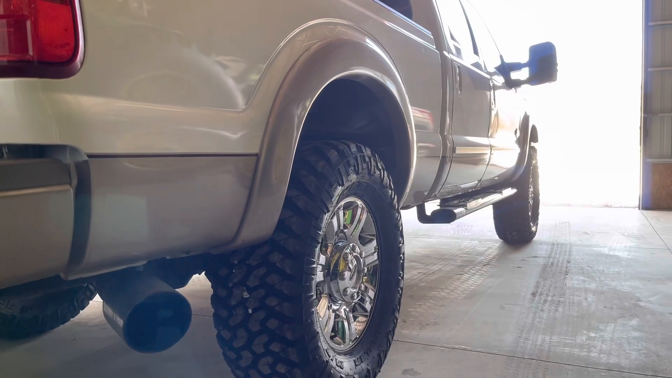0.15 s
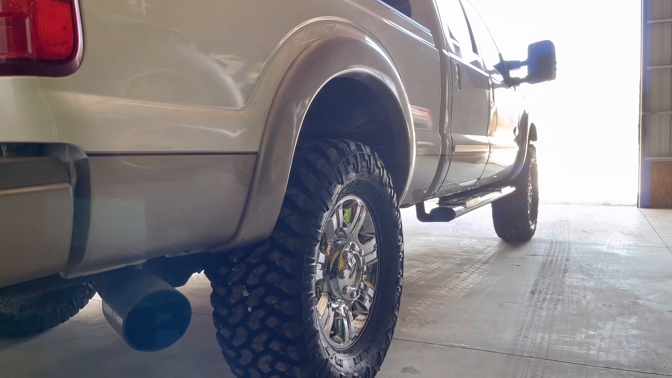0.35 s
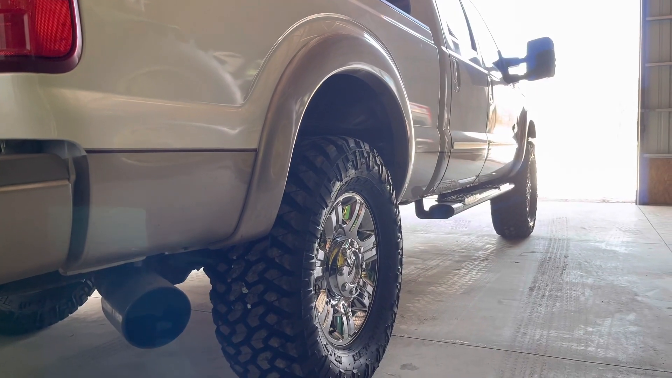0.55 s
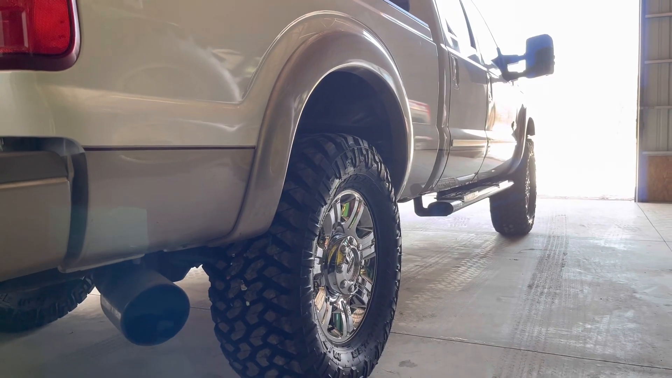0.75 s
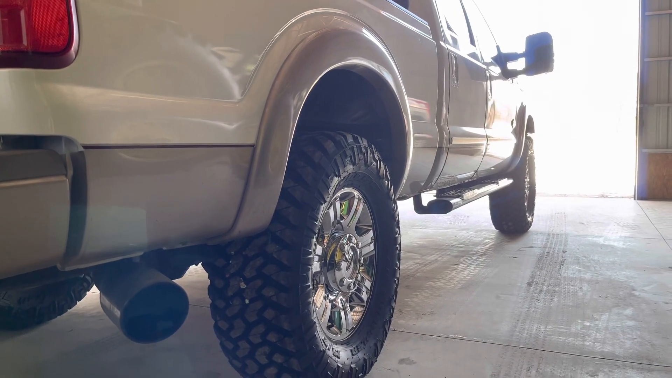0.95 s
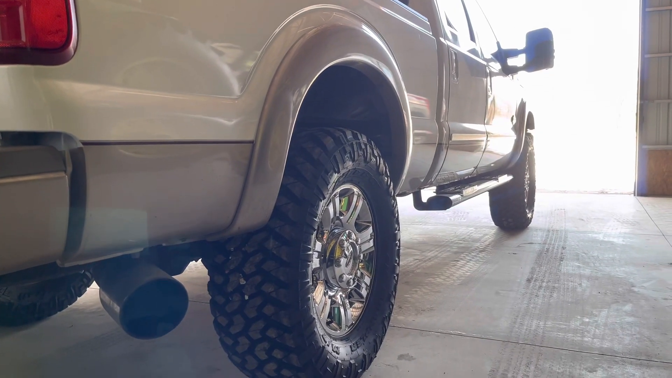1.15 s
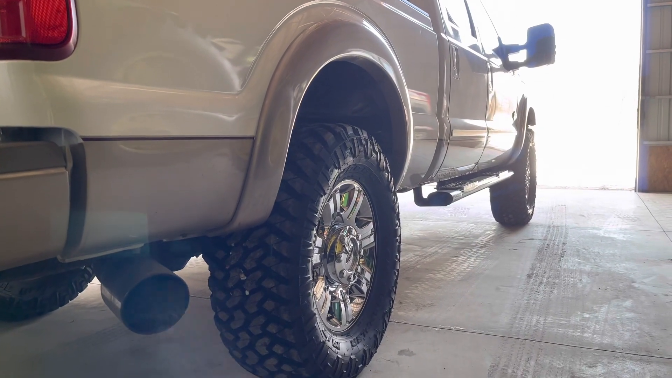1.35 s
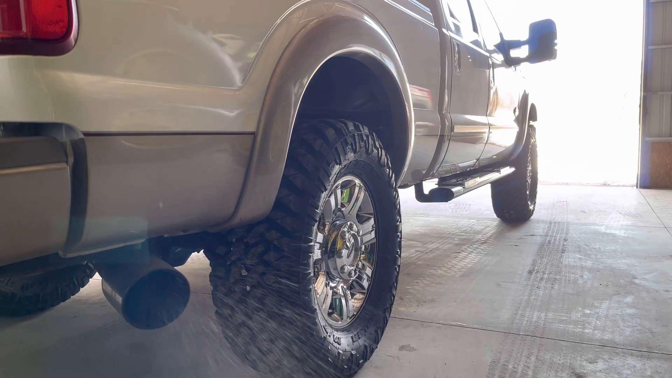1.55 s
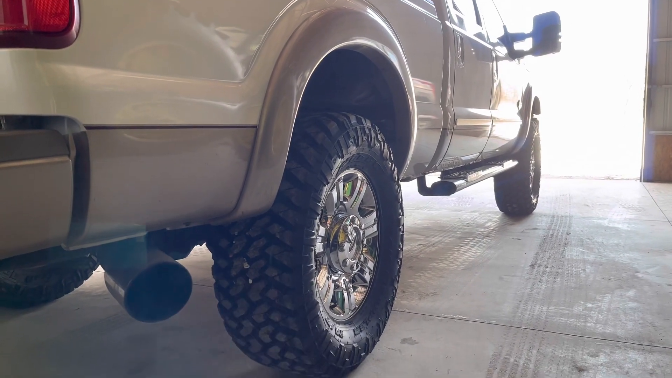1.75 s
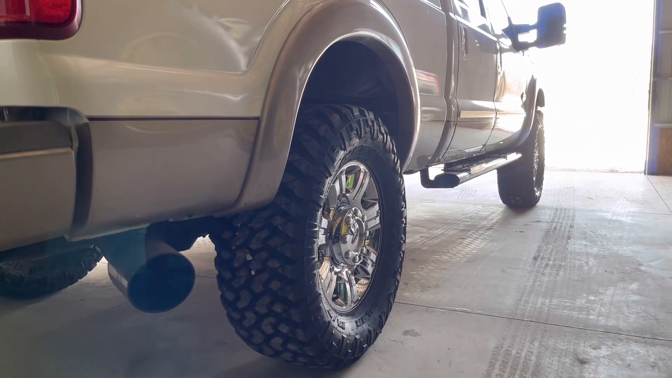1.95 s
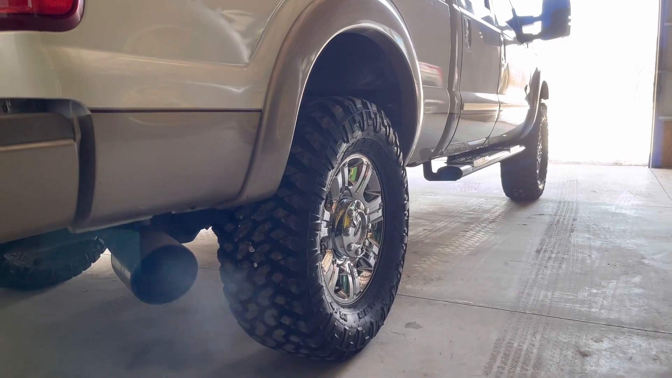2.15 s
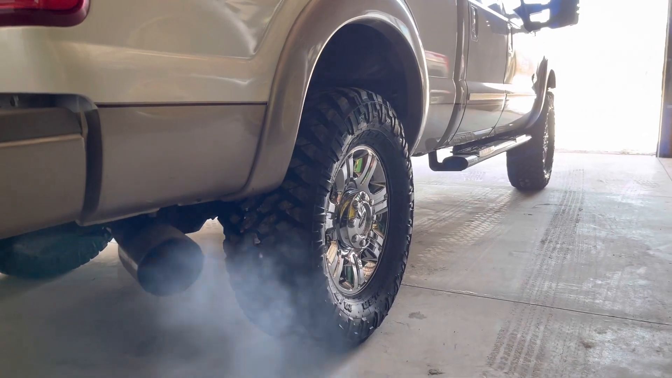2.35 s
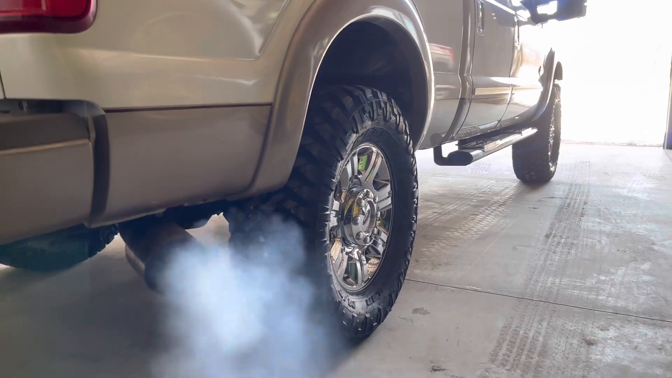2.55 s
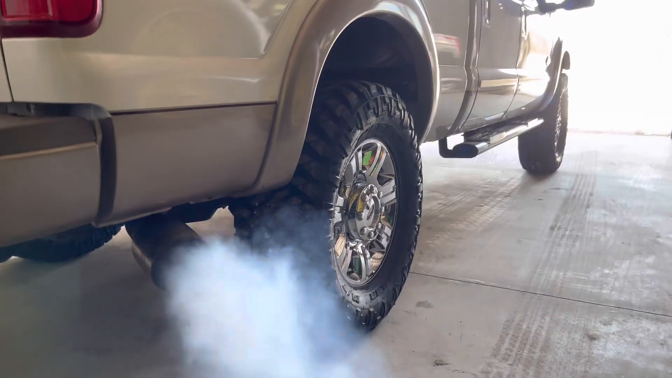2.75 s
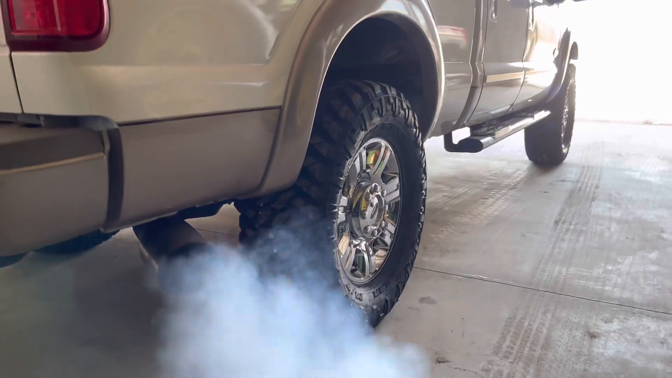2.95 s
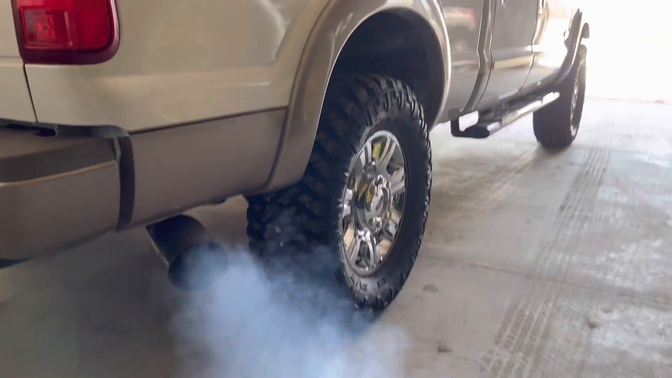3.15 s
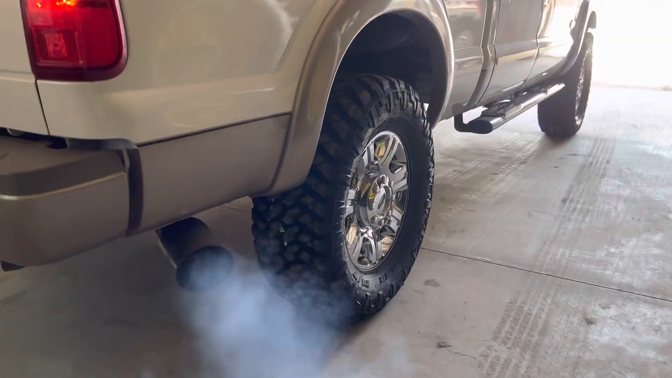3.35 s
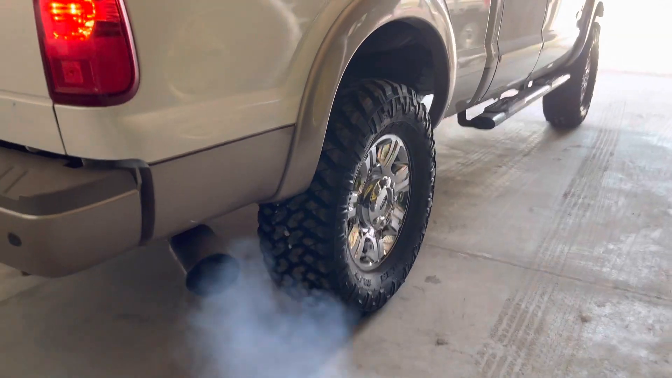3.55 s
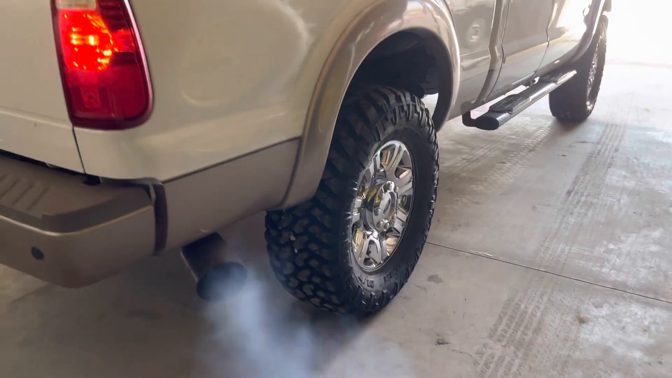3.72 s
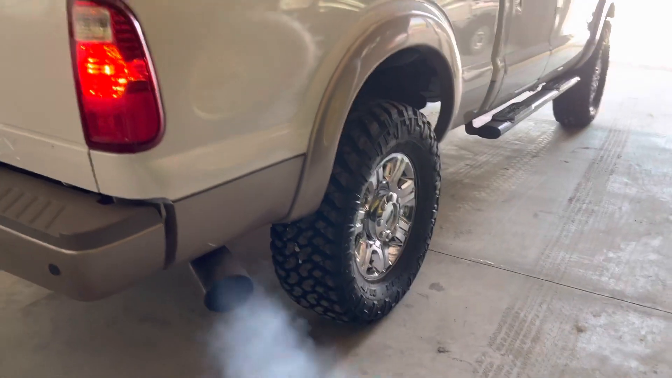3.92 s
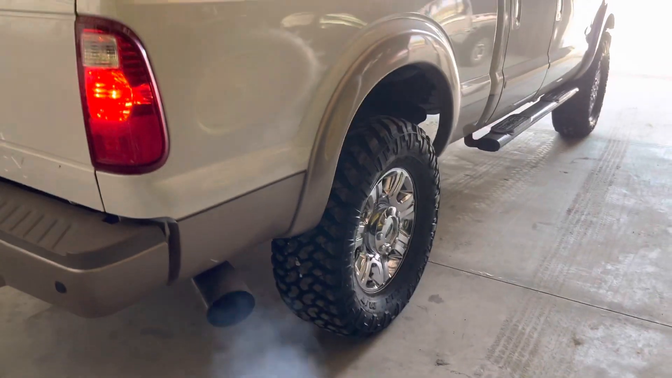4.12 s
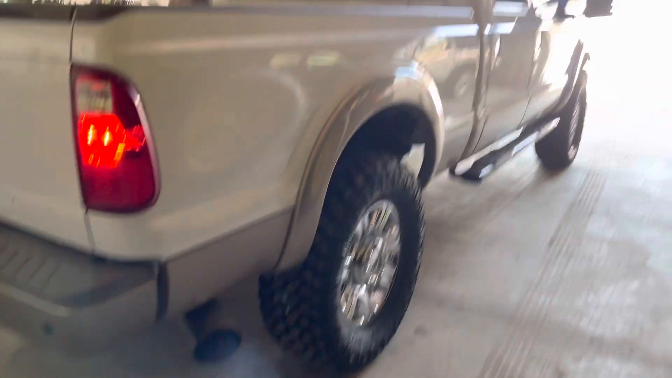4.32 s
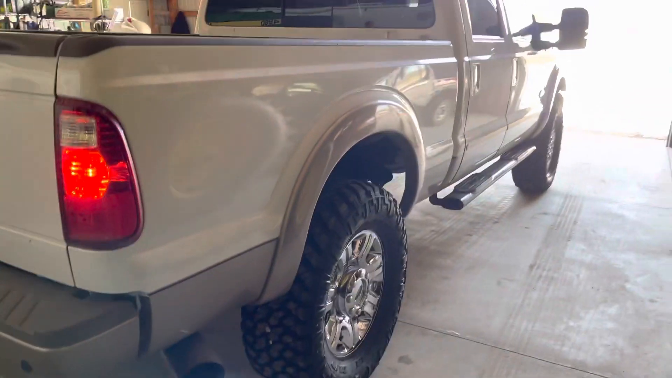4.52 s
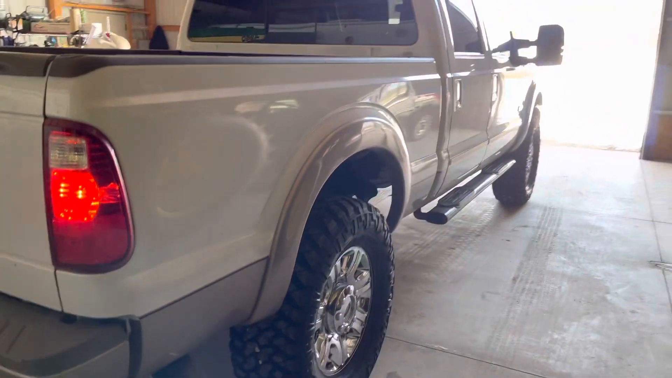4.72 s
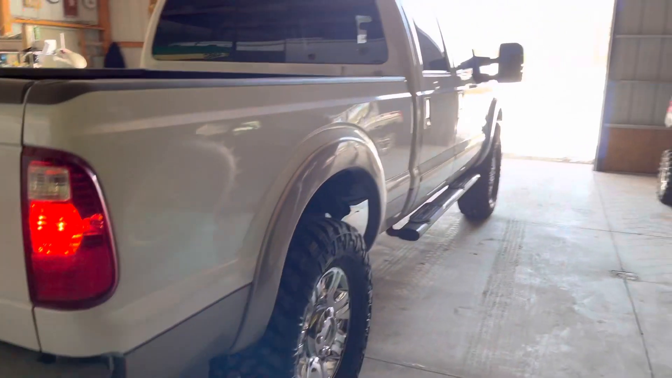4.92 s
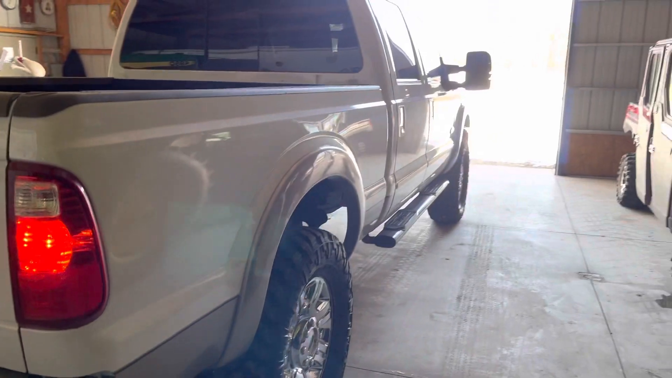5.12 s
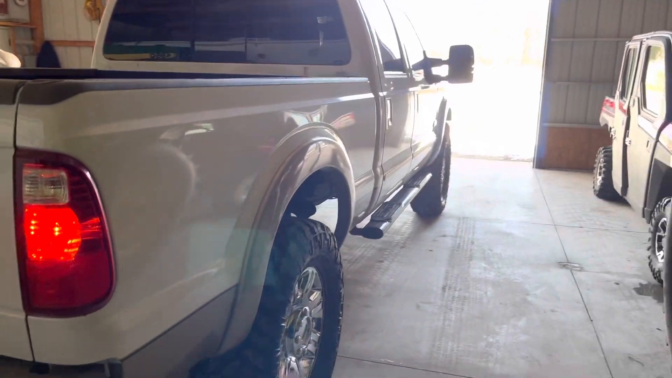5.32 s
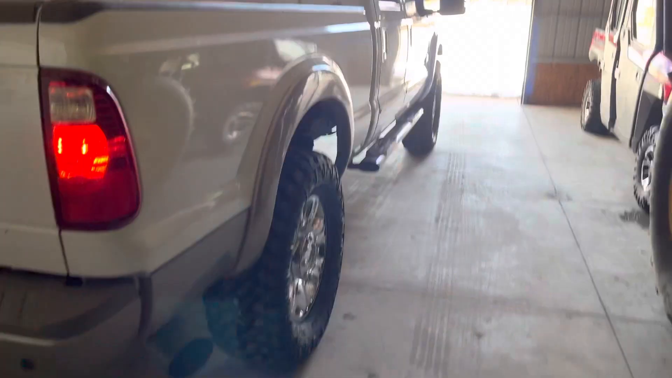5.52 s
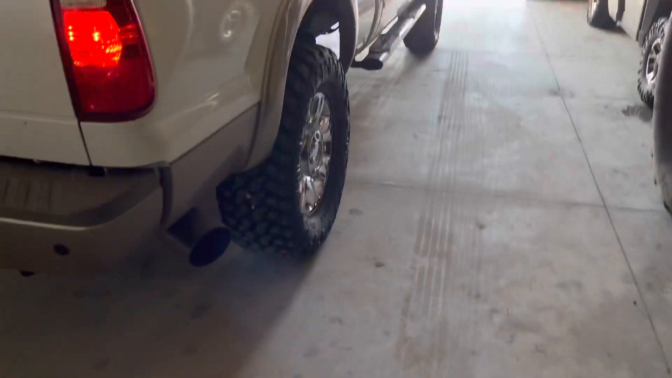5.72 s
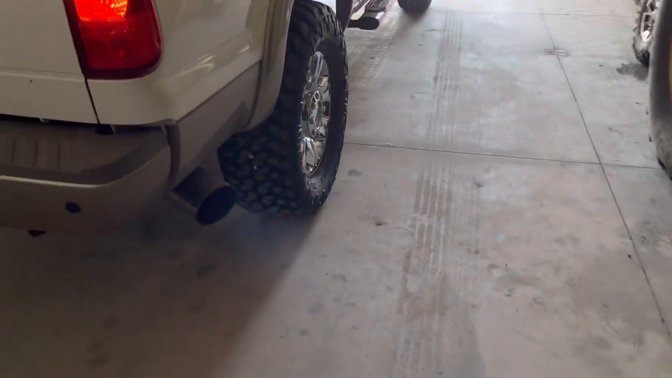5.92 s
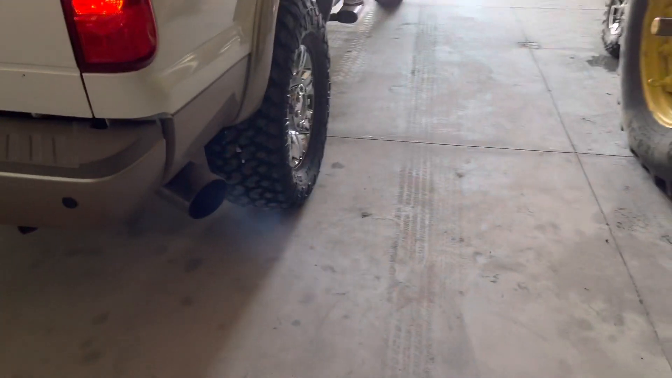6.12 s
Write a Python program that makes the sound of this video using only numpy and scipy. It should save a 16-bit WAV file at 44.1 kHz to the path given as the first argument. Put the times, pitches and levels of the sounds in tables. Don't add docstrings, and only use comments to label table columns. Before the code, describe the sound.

From 0 to 0.5 seconds there is only faint outdoor rumble and a very quiet fuel pump hum. At 0.54 a starter pinion clacks in; its rough metallic whine rises and sags against each compression, with grinding, short squeals and soft low puffs of air from the exhaust. Around 1.2 the diesel catches abruptly, very loud and close: ragged bangs, booming pipe and coarse roar, racing slightly and stumbling until about 2. A thin rising squeal of the released starter fades by 1.4. From 1.9 to 3.1 loose sheet metal rattles over uneven firing as the level falls. After 3.2 it is a regular, fast, low throbbing idle with dull knocks, valve clatter, hiss and sharp ticks, a little more distant, continuing to the cut at about 6.2. Concrete walls add short, bright reverberation throughout.

```python
import sys
import numpy as np
from scipy import signal
from scipy.fft import rfft, irfft, next_fast_len
from scipy.io import wavfile
from scipy.ndimage import uniform_filter1d

SR = 44100
rng = np.random.default_rng(int(sys.argv[2]) if len(sys.argv) > 2 else 0)


def invert_db(x):
    u = np.asarray(x, float) / 20
    return 10 ** u


def int16_out(signal):
    q = np.round(np.clip(np.atleast_2d(signal).T, -1, 1) * 32767)
    wavfile.write(sys.argv[1], SR, q.astype(np.int16))


N = 272097


def unit(x):
    return x / np.sqrt(np.mean(x ** 2) + 1e-20)


def along(points, hz):
    f, v = np.transpose(points)
    return np.interp(np.log(hz + 1), np.log(f + 1), v)


def curves(rows):
    s, *cols = np.transpose(rows)
    return [np.interp(np.arange(N) / SR, s, c) for c in cols]


def filtered(x, response):
    m = next_fast_len(N + SR // 4, real=True)
    return irfft(rfft(x, m) * response(np.fft.rfftfreq(m, 1 / SR)), m)[..., :N]


def coloured(x, spectrum):
    return unit(filtered(x, lambda hz: invert_db(along(spectrum, hz))))


def ringing(x, modes):
    top_hz = 2 * max(c for c, w, db in modes)

    def body(f):
        return sum(invert_db(db) * 1j * f * w / (c * c - f * f + 1j * f * w) for c, w, db in modes)

    return unit(filtered(x, lambda f: body(f) / (1 + 1.4j * f / top_hz - (f / top_hz) ** 2)))


def steady(x, span_s):
    return x / np.sqrt(np.abs(uniform_filter1d(x ** 2, int(span_s * SR))) + 1e-4)


def smooth(x, samples):
    return uniform_filter1d(uniform_filter1d(x, samples), samples)


def between(t0, t1, fade_s):
    t = np.arange(N) / SR
    return (t > t0) * invert_db(-60 * np.clip(t - t1, 0, None) / fade_s)


def hits(at, db):
    return np.bincount(np.clip(at, 0, N - 1).astype(int), invert_db(db), N)


def strikes(rows, t60, rise_s):
    t = np.arange(SR // 5) / SR
    marks = np.bincount([round(s * SR) for s, db in rows], [invert_db(db) for s, db in rows], N)
    return signal.fftconvolve(marks, invert_db(-60 * t / t60) * (1 - np.exp(-t / rise_s)))[:N]


# time in seconds, firings per second.
FIRING = [(1.2, 23), (1.3, 42.5), (1.37, 43.5), (1.43, 47), (1.445, 56), (1.52, 55), (1.535, 48.5),
          (1.58, 49), (1.6, 54), (1.7, 55.57), (1.8, 58.17), (1.95, 56.64), (2.3, 56.5), (2.5, 55.34),
          (2.75, 53.55), (3.0, 54.25), (3.3, 53.62), (6.17, 53.55)]
# time in seconds, share 0-1.
COLD = [(1.2, .96), (1.9, .8), (2.5, .9), (3.2, .15), (4, 0), (6.2, .08)]
# pulse, block ring, knock, tick and hiss, all in dB.
CYLINDERS = [(-1.7, -5, -1.7, -9.5, -4.2), (-2.2, -.5, -2.6, -10.4, -1.4), (-5.0, 0.0, 0.0, -6.3, -1.1),
             (-1.6, -7.5, -1.0, -9.8, -4.1), (-2.4, -4.1, -0.4, -9.3, -3.0),
             (-1.5, -4.7, -2.2, -10.5, -4.8), (0.0, -1.9, -0.7, 0.0, 0.0), (-3.8, -6.2, -1.2, -8.1, -2.6)]


def turn_crank():
    running = np.arange(N) / SR >= FIRING[0][0]
    fired = np.cumsum(curves(FIRING)[0] * running) / SR
    number = np.arange(int(fired[-1]) + 1)
    luck = rng.standard_normal((len(number), 16)).T
    cold = curves(COLD)[0]

    def moment(part):
        return np.interp(number + part, fired[running], np.arange(N)[running])

    def burst(part, db, t60, floor_db):
        t = np.arange(SR // 10) / SR
        shape = invert_db(-60 * t / t60) * (1 - np.exp(-t / .003))
        envelope = signal.fftconvolve(hits(moment(part), db), shape)[:N] + invert_db(floor_db)
        return envelope * rng.standard_normal(N)

    chill = cold[moment(0).astype(int)]
    habits = np.array(CYLINDERS)[number % 8].T
    return dict(fired=fired, number=number, luck=luck, cold=cold, chill=chill, habits=habits,
                moment=moment, burst=burst)


# time in seconds, share 0-1.
LOW_DOWN = [(2.55, 0.99), (2.95, 0.89), (3.6, 0.33), (6.2, 0.37)]


def crouch():
    return np.clip(curves(LOW_DOWN)[0], 0, 1)


# time in seconds, level in dB under the pipe.
WHEEL_ARCH = [(2.9, -20), (3.4, -4), (3.75, -8), (4.2, -11.5), (6.2, -12)]


def arch_db():
    return curves(WHEEL_ARCH)[0]


# frequency in Hz, level in dB.
PULSE = [(30, -44), (42, 16), (52, 11), (80, 21.5), (110, 9.5), (128, 14), (160, -34), (2000, -120)]


def exhaust_pulses(crank):
    chill, luck, pulse = crank["chill"], crank["luck"], crank["habits"][0]
    opening = crank["moment"](.1 + .015 * chill * luck[0])
    db = (1 - .6 * chill) * pulse + (.6 + .5 * chill) * luck[1]
    dips = -coloured(hits(opening, db), PULSE)
    return dips + 0.5 * crouch() * filtered(dips, lambda hz: 1 / (1 + (85 / (hz + 1)) ** 8))


# far bank 0 or 1, then the blow on each of the four pipe modes in dB.
BLOWDOWN = [(1, -4, -12, -17, -2), (1, -9, -8, -22, -5), (0, -13, 0, -15, -8), (1, -9, -12, -22, -12),
            (0, -4, -13, 0, 0), (1, -4, -13, -24, -9), (0, 0, -11, -18, -3), (0, -6, -11, -13, -14)]
# frequency in Hz, width in Hz, level in dB.
PIPE = [(175, 15, -.5), (265, 50, -7), (340, 12, -1), (410, 45, -4)]
# frequency in Hz, density in dB per Hz.
ROAR = [(30, -74), (75, -5.5), (128, -11.5), (140, -3.5), (173, -9.5), (199, -9), (273, -13.5),
        (461, -10.5), (900, -30), (1170, -30), (1980, -120)]


def tailpipe(crank):
    fired, cold, chill, luck = crank["fired"], crank["cold"], crank["chill"], crank["luck"]
    far, *blows = np.array(BLOWDOWN)[crank["number"] % 8].T
    arrive = crank["moment"](.3) + SR * (.0034 * far + (.0001 + .0005 * chill ** 2) * luck[2])
    rings = []
    for k, ((hz, width, db), blow) in enumerate(zip(PIPE, blows)):
        blow_db = (1 - .7 * chill) * blow + (.6 + .3 * k + 2 * chill) * luck[12 + k]
        mode = ringing(hits(arrive, blow_db), [(hz, width, 0)])
        rings.append(invert_db(db) * ringing(mode, [(hz, 160, 0)]))
    lowest, *upper = filtered(
        np.array(rings), lambda hz: 1 / (1 + (120 / (hz + 1)) ** 6) / (1 + (hz / 650) ** 6))
    roar = coloured(crank["burst"](0.35, (3 + 4 * chill) * luck[6], t60=0.067, floor_db=5.5), ROAR)
    rasp = np.clip(.045 + .95 * cold, 0, 1)
    pipe = (.75 - .5 * cold) * lowest
    pipe = pipe + np.sqrt(1 - rasp) * (1 - .6 * crouch()) * sum(upper)
    pipe = pipe + invert_db(4.5) * np.sqrt(rasp) * roar
    pipe = pipe + invert_db(arch_db()) * ringing(roar, [(230, 110, -9.5), (538, 270, -8)])
    cycle = (fired / 8 + .28) % 1
    sag = np.sin(np.pi * cycle) * np.sin(2 * np.pi * np.cumsum(205 - 50 * cycle) / SR)
    pipe = pipe + invert_db(arch_db() + 8) * (1 - cold) * sag
    return pipe + invert_db(6) * cold * np.sin(2 * np.pi * (3 * fired - .27))


# frequency in Hz, density in dB per Hz.
KNOCK_COLD = [(410, 7), (700, 9), (1110, -12.5), (1220, -15), (1370, 0), (1590, -4.5), (1760, 5.5),
              (2080, -6), (2420, 3), (3100, -4.5), (4030, -69), (6820, -120)]
# frequency in Hz, density in dB per Hz.
KNOCK_WARM = [(410, -32), (700, -81), (808, -4), (1040, 3.5), (1080, 4), (1230, -40), (1460, -9.5),
              (1680, -11), (1850, -71), (1960, 1.5), (2160, -37), (2420, -21.5), (3100, -8), (4030, -48),
              (6820, -120)]


def block_knock(crank):
    share, luck, burst = crouch(), crank["luck"], crank["burst"]
    _, block, knock, _, _ = crank["habits"]
    blows = burst(.4, knock + (2.3 + .2 * crank["chill"]) * luck[7], t60=.036, floor_db=-16)
    knocks = np.sqrt(share) * coloured(blows, KNOCK_COLD) + np.sqrt(1 - share) * coloured(blows, KNOCK_WARM)
    jolts = burst(.35, 1.3 * block + 2 * luck[8], t60=.012, floor_db=-45)
    ring = ringing(jolts, [(1040, 130, 0), (1880, 170, -3)])
    sump = ringing(blows, [(1910, 150, 0), (2420, 160, -4)])
    knocks = knocks + (1 - share) * (ring + invert_db(-5) * sump)
    return knocks + invert_db(arch_db() - 2.5) * ringing(blows, [(2620, 240, 0)])


# frequency in Hz, density in dB per Hz.
HISS = [(2800, -9.5), (3100, 0), (4500, 1), (6900, 8), (7800, 10), (8600, 10), (9500, 4), (10200, -6),
        (10800, -13), (11800, 0), (13200, -7.5), (14800, -20), (16000, -90)]
# frequency in Hz, width in Hz, level in dB.
COVERS_COLD = [(3540, 78, -0.38), (4700, 570, -0.011), (6380, 33, 0.89), (7120, 650, 0.55)]
# frequency in Hz, width in Hz, level in dB.
COVERS_WARM = [(3580, 110, 0.0044), (4210, 1040, 0.0071)]


def valve_clatter(crank):
    share, luck, burst = crouch(), crank["luck"], crank["burst"]
    _, _, _, tick, hiss = crank["habits"]
    valves = burst(.45, 1.3 * hiss + 2.8 * luck[9], t60=.06, floor_db=-17)
    covers = np.sqrt(share) * ringing(valves, COVERS_COLD) + np.sqrt(1 - share) * ringing(valves, COVERS_WARM)
    air = burst(.45, 1.5 * hiss + 4 * luck[11], t60=.06, floor_db=-9)

    def below_8k(hz):
        return 1 / (1 + (hz / 8000) ** 16)

    clatter = filtered(coloured(valves, HISS) + invert_db(-12.5) * covers, below_8k)
    clatter = clatter + filtered(coloured(air, HISS), lambda hz: 1 - below_8k(hz))
    ticks = burst(.52, 1.7 * tick + luck[10], t60=.022, floor_db=-54)
    ticks = ringing(ticks, [(3710, 500, 0), (4450, 400, -9)])
    clatter = filtered(clatter, lambda hz: 1 - 0.39 / (1 + ((hz - 3250) / 200) ** 2))
    return clatter + invert_db(-13.5) * (1 - share) * ticks


# time in seconds, level in dB over idle.
FUEL = [(1.22, 15.5), (1.8, 12), (1.95, 9), (2.65, 4), (4.1, 1.5), (6.17, 2)]
# time in seconds, distance in metres.
DISTANCE = [(1.22, 0.43), (2.2, 0.4), (2.6, 0.86), (3.2, 1.11), (4.4, 2), (5.1, 2.4), (6.17, 1.54)]
# relight time in seconds, depth in dB, fading time in seconds.
MISFIRES = [(1.236, 16, 0.056), (1.315, 2, 0.068), (1.435, 5, 0.11), (1.589, 14, 0.085),
            (1.716, 25.5, 0.054), (1.87, 24, 0.043), (2.008, 14, 0.02), (2.1, 5, 0.031), (2.24, 4, 0.041),
            (2.88, 17, 0.013)]
# idle level in dB at 1 m, then the share (0-1) of the extra fuel, of a misfire and of the distance law.
LAYERS = [
    (-14.5, 0.028, 0.35, 0.44),
    (-22.5, 0.46, 0.036, 0.16),
    (-35.5, 0.75, 0.37, 0.31),
    (-39, 1, 0.75, 0.11),
]
RELIGHT_S = 0.0084


def burn():
    t = np.arange(N) / SR
    lost_db = 0
    for s, db, fade_s in MISFIRES:
        lost_db = lost_db + db * np.interp(t, [s - fade_s, s - RELIGHT_S / 2, s + RELIGHT_S / 2], [0, 1, 0])
    fuel_db = curves(FUEL)[0]
    away_db = 20 * np.log10(curves(DISTANCE)[0])
    return [db + fuel * fuel_db - miss * lost_db - away * away_db for db, fuel, miss, away in LAYERS]


def engine():
    crank = turn_crank()
    layers = [steady(exhaust_pulses(crank), 0.13), steady(tailpipe(crank), 0.56),
              steady(block_knock(crank), 0.24), invert_db(1.5) * steady(valve_clatter(crank), 0.6)]
    return between(1.219, 9, 1) * sum(invert_db(db) * layer for db, layer in zip(burn(), layers))


# time in seconds, crack in dB, boom in dB.
BANGS = [(1.2224, -7.5, -5), (1.2531, -0.5, -9), (1.285, -3, -7.5), (1.328, -7, -9), (1.3513, -6, -17),
         (1.417, -12, -2), (1.4565, 0.5, -10), (1.493, -5, -3.5), (1.609, -29, -5.5), (1.6274, -14, -10),
         (1.656, -17, -15), (1.7178, -5.5, -5.5), (1.785, -11, -5.5), (1.7524, -2.5, -10.5),
         (1.822, -1.5, -7), (1.854, -5.5, -11), (1.895, -23, -34), (2.032, -6, -18), (2.1363, -5.5, -10),
         (2.319, -11, -17), (2.421, -8, -13), (2.458, -22, -22), (2.712, -18, -16), (3.01, -14.5, -26.5)]


def bangs():
    noise = rng.standard_normal((2, N))
    cracks = [(s, crack_db - 4.5) for s, crack_db, boom_db in BANGS]
    booms = [(s, boom_db) for s, crack_db, boom_db in BANGS]
    bright = invert_db(-6) * coloured(noise[0], KNOCK_COLD) + invert_db(-10.5) * ringing(noise[0], COVERS_COLD)
    crack = strikes(cracks, t60=0.049, rise_s=0.00055) * bright
    thump = ringing(strikes(booms, t60=0.002, rise_s=0.00016), [(485, 140, 22), (660, 170, -28)])
    boom = invert_db(-7.5) * strikes(booms, t60=0.12, rise_s=0.0007)
    boom = boom * ringing(noise[1], [(484.5, 21, 20), (610, 35, -23)])
    return crack + invert_db(-33.5) * thump + invert_db(-1) * boom


def pings(rows, t60, spread):
    out, t = np.zeros(N + SR), np.arange(SR // 12) / SR
    detune = rng.standard_normal((len(rows), 3))
    for (s, db, hz), d in zip(rows, detune):
        ring = np.sin(2 * np.pi * hz * np.outer(1 + spread * d, t)).sum(axis=0)
        out[round(s * SR):][:len(t)] += invert_db(db - 60 * t / t60) * (1 - np.exp(-t / 0.00092)) * ring
    return out[:N]


# time in seconds, peak in dB, frequency in Hz.
RATTLES = [(1.8908, -18, 2380), (1.9252, -24, 2538), (1.9437, -35, 2450), (1.9621, -17, 2620),
           (2.0155, -25, 2350), (2.0494, -18, 2440), (2.1193, -20, 2600), (2.1417, -20, 2350),
           (2.1722, -22, 2400), (2.226, -26, 2520), (2.243, -19, 2480), (2.2689, -18, 2400),
           (2.3009, -15.5, 2470), (2.3158, -14, 2400), (2.3867, -25, 2480), (2.4046, -32, 2360),
           (2.46, -16, 2530), (2.5159, -30, 2420), (2.5513, -24, 2380), (2.5703, -22, 2430),
           (2.6062, -25, 2730), (2.6426, -25, 2570), (2.7144, -15, 2470), (2.7533, -24, 2420),
           (2.7898, -40.5, 2360), (2.8117, -34, 2530), (2.8232, -27, 2270), (2.8835, -30, 2410),
           (2.9065, -25, 2780), (2.9773, -37, 2370), (3.0118, -32, 2300), (3.0502, -41, 2210),
           (3.1031, -33, 2760), (3.121, -33, 2200), (4.090, -21.5, 1000), (4.987, -27, 990)]
# time in seconds, peak in dB, frequency in Hz.
TICKS = [(3.1248, -29, 6030), (3.1826, -24, 5370), (3.2739, -19, 3240), (3.3852, -21, 3300),
         (3.478, -27, 6330), (3.5713, -22, 5450), (3.6665, -26, 4710), (3.7209, -33, 6250),
         (3.7808, -33, 5600), (3.7957, -31, 4220), (3.8721, -25, 5660), (3.9309, -29, 4630),
         (4.0202, -19.5, 3900), (4.1684, -21, 3600), (4.2268, -28.5, 3360), (4.2442, -31, 5030),
         (4.3191, -24, 3540), (4.3739, -36, 6300), (4.4692, -21.5, 3560), (4.5236, -22.5, 5950),
         (4.6194, -26, 3880), (4.768, -25, 3610), (4.803, -23, 4220), (4.9152, -17.5, 4090),
         (5.0664, -24, 3600), (5.1397, -34, 4000), (5.217, -22, 3700), (5.2699, -27, 5870),
         (5.3642, -25, 3940), (5.4375, -25, 6380), (5.5133, -24, 3900), (5.5867, -21, 3770),
         (5.6645, -24.5, 3630), (5.7184, -31, 3510), (5.8112, -27, 3680), (5.887, -29, 6320),
         (5.9613, -28, 4200), (6.111, -30, 4100)]


def rattles():
    shield = invert_db(-6) * pings(RATTLES, t60=0.037, spread=0.031)
    return shield + invert_db(-8.5) * pings(TICKS, t60=0.028, spread=.08)


# time in seconds, tooth rate in Hz.
TEETH = [(.545, 970), (.62, 1003), (.69, 1224), (.745, 940), (.82, 1322), (.885, 1063), (.905, 1388),
         (.93, 1413), (1.0, 1380), (1.04, 1440), (1.21, 1516)]
ENGAGE_S, SPIN_UP_S, FREED_S = .545, .07, .93
SWEET_HZ, SWEET_WIDTH_HZ, SWEET_DB = 1405, 45, 8
TOOTH_DB, STRAIN_DB, FREED_DB_PER_S = -32.5, 4, 150
OVERTONE_DB, OVERTONE_DB_PER_S = -29, 24


def pinion():
    t = np.arange(N) / SR
    hz, = curves(TEETH)
    strain = uniform_filter1d(1.0 * (np.gradient(hz) < 0), int(0.053 * SR))
    voice_db = STRAIN_DB * strain - 20 * np.clip(1 - (t - ENGAGE_S) / SPIN_UP_S, 0, 1)
    sweet_db = SWEET_DB / (1 + ((hz - SWEET_HZ) / SWEET_WIDTH_HZ) ** 2)
    tooth_db = TOOTH_DB + voice_db + sweet_db - FREED_DB_PER_S * np.clip(t - FREED_S, 0, None)
    overtone_db = OVERTONE_DB - 1.5 + voice_db - OVERTONE_DB_PER_S * (t - ENGAGE_S)
    return hz, tooth_db, overtone_db


# time in seconds, peak in dB,
# frequency in Hz.
PUFFS = [(0.571, -32, 75.6), (0.601, -28.5, 57), (0.659, -31, 54), (0.728, -22.5, 54), (0.799, -30, 53.4),
         (0.837, -23.5, 64.5), (0.873, -26, 65), (0.921, -32, 74), (0.959, -35, 62), (1.025, -28, 64.6),
         (1.08, -30, 70.6), (1.129, -32, 54.5), (1.171, -22.5, 82), (1.23, -19, 106), (1.263, -18, 102)]


def air_puffs():
    puffs, t = np.zeros(N + SR), np.arange(SR // 4) / SR
    for s, db, hz in PUFFS:
        swell = invert_db(db + 16 - 60 * t / 0.13) * (1 - np.exp(-t / 0.013))
        puffs[round(s * SR):][:len(t)] += swell * np.sin(2 * np.pi * hz * t)
    return puffs[:N]


# frequency in Hz, density in dB per Hz.
GRIND = [(76, -40), (130, -5), (192, -5), (220, -14), (297, -0.5), (384, -4.5), (584, -10), (755, -5.5),
         (830, -4), (1370, -3), (1520, -9), (1720, -15), (2260, -6), (3300, -10), (4290, -13.5),
         (7260, -120)]
# frequency in Hz, width in Hz, level in dB.
HOUSING = [(1300, 25, -22), (1480, 31, 9.5), (1920, 37, -12), (2380, 13, 14), (2200, 100, 3),
           (2840, 78.6, 7.5)]
# time in seconds, peak in dB.
CLACKS = [
    (0.5436, -16),
    (1.0294, -19.5),
    (1.1184, -16),
]
GRIND_DB, BRUSH_DB = -26, -33


def starter():
    tooth_hz, tooth_db, overtone_db = pinion()
    flutter = unit(smooth(rng.standard_normal((8, N)), 240))
    turn = 2 * np.pi * np.cumsum(tooth_hz * (1 + .006 * flutter[0])) / SR
    partials = [(1, tooth_db + 1), (1.94, overtone_db + 2.5), (3, overtone_db - 14),
                (.78, tooth_db - 15), (1.14, overtone_db - 13), (2.3, overtone_db - 5)]
    whine = 0
    for k, (multiple, db) in enumerate(partials):
        whine = whine + invert_db(db) * (1 + .5 * flutter[k + 1]) * np.sin(multiple * turn)
    grit = rng.standard_normal((4, N))
    grind = invert_db(-2.5) * coloured(grit[0], GRIND) + invert_db(-10) * ringing(grit[1], HOUSING)
    sparking = invert_db(1.4 * unit(uniform_filter1d(grit[0], 40)))
    brushes = coloured(grit[2] * sparking, HISS)
    gear = whine + invert_db(GRIND_DB + 1.8 * flutter[0]) * grind
    gear = gear + invert_db(BRUSH_DB + 2 + 2 * flutter[5]) * brushes
    steel = ringing(grit[3], [(2520, 590, 8), (3060, 500, -3), (3700, 130, -2), (6900, 900, -18)])
    clack = invert_db(-1.5) * strikes(CLACKS, t60=0.11, rise_s=0.0032) * steel
    fade_in = np.clip((np.arange(N) / SR - .53) / 0.012, 0, 1) ** 3
    return between(.53, 1.21, 0.6) * fade_in * gear + clack + air_puffs()


# time in seconds, peak in dB, frequency in Hz, length in seconds.
SQUEALS = [(0.63, -26, 1970, 0.04), (0.683, -24, 2340, 0.053), (0.673, -36, 2600, 0.027),
           (0.747, -21.5, 940, 0.019), (0.768, -30, 2830, 0.039), (0.816, -24, 1330, 0.034),
           (.83, -29.5, 3200, 0.032), (0.914, -31, 762, 0.083), (0.935, -25, 2800, 0.029),
           (0.896, -34, 2170, .12), (0.88, -32, 926, 0.14), (1.044, -24.5, 1329, .03),
           (1.049, -27, 2825, 0.046), (1.088, -23, 1396, 0.026), (1.125, -20, 1450, 0.02),
           (1.2, -35, 3500, 0.028), (0.69, -35.5, 4800, .03), (.93, -28.5, 7500, 0.037),
           (.97, -26, 6650, 0.024), (1.049, -31, 6600, 0.038), (1.7, -33, 4150, 0.019),
           (1.124, -28, 6900, 0.036), (1.12, -37, 5000, .03), (0.72, -30, 2150, .06),
           (0.774, -31.5, 1880, 0.084), (.765, -30, 970, .05), (.69, -25, 1225, .04), (1, -35, 2250, 0.11),
           (.92, -26, 1405, 0.044), (.975, -31, 1390, .06), (.955, -27, 1200, 0.034),
           (0.9, -26, 1530, 0.034), (1.007, -36, 3850, .015), (1.02, -32, 5300, 0.016),
           (1.15, -32, 4220, .015), (.67, -30, 330, 0.03), (.58, -30, 440, .04), (0.62, -32, 510, 0.024),
           (0.95, -35, 335, 0.072), (1.046, -31.5, 400, 0.044), (1.177, -26, 490, 0.026)]


def squeals():
    t = np.arange(N) / SR
    rough = 1 + 0.74 * unit(uniform_filter1d(rng.standard_normal(N), 200))
    tones = 0
    for s, db, hz, length in SQUEALS:
        tones = tones + invert_db(db) * np.exp(-(2 * (t - s) / length) ** 2) * np.sin(2 * np.pi * hz * t)
    return rough * tones


# time in seconds, frequency in Hz, level in dB.
OVERRUN = [(.9, 3600, -52), (1, 3900, -36), (1.03, 3950, -30), (1.08, 4000, -32), (1.15, 4230, -28),
           (1.19, 4480, -30), (1.3, 4750, -30), (1.45, 4800, -52)]


def overrun():
    hz, db = curves(OVERRUN)
    grain = unit(smooth(rng.standard_normal(N), 90))
    return between(1.0, 1.2, .05) * invert_db(db - 3.5) * grain * np.sin(2 * np.pi * np.cumsum(hz) / SR)


# frequency in Hz, density in dB per Hz.
QUIET = [(18, -28), (30, -7), (59, 1), (159, -18), (262, -13.5), (433, -32), (474, -24), (532, -31),
         (801, -40), (1740, -33), (3370, -52.5), (6540, -42), (7000, -37), (9100, -48), (12500, -54),
         (13500, -45), (15400, -120)]
QUIET_DB = -49.5
# frequency in Hz, level in dB.
PUMP = [(473.7, -69)]


def quiet():
    (hz, db), = PUMP
    pump = invert_db(db + 5) * between(0, 0.43, .3) * np.sin(2 * np.pi * hz * np.arange(N) / SR)
    return invert_db(QUIET_DB) * coloured(rng.standard_normal(N), QUIET) + pump


# frequency in Hz, t60 in seconds.
SHED = [(100, 0.18), (1000, 0.51), (8000, 0.18)]


def shed(x):
    hz, t, z = signal.stft(rng.standard_normal((2, SR // 2)), SR, nperseg=256)
    tail = signal.istft(z * invert_db(-60 * t / along(SHED, hz)[:, None]), SR, nperseg=256)[1]
    return signal.fftconvolve(x[None], tail / np.linalg.norm(tail[0]), axes=1)[:, :N]


# frequency in Hz, likeness -1 to 1.
ALIKE = [(60, .999), (125, .985), (250, .93), (500, .92), (1000, .8), (1900, .92), (2600, .7), (4000, .62),
         (8000, .85), (12000, .95)]
# frequency in Hz, extra left lead in radians.
BLOCK_LEAD = [(1000, 0), (1250, -.4), (1600, .45), (1850, -1), (2100, -.9), (2500, 0)]
# frequency in Hz, extra left lead in radians.
STARTER_LEAD = [(850, 0), (1600, -3.1), (1750, -.9), (2300, -.8), (2700, 0), (4000, -.6), (5200, 0)]


def scene():
    running = engine() + bangs() + rattles() + quiet()
    cranking = starter() + squeals() + overrun()
    common, other = shed(running + cranking)

    def turn(hz):
        return np.arccos(np.clip(along(ALIKE, hz), -1, 1)) / 2

    def direct(x, lead):
        return filtered(x, lambda hz: np.cos(turn(hz)) * np.exp(np.outer([.5j, -.5j], along(lead, hz))))

    walls = invert_db(-11) * filtered(common, lambda hz: np.cos(turn(hz)) / (1 + (250 / (hz + 1)) ** 4))
    wide = filtered(other, lambda hz: np.sin(turn(hz)))
    return direct(running, BLOCK_LEAD) + direct(cranking, STARTER_LEAD) + np.array([walls + wide, walls - wide])


def dropped(x, kept):
    hz, t, z = signal.stft(x, SR, nperseg=2048)
    band = np.arange(len(hz)) // 16
    level = np.log(np.sum(np.abs(z[hz > 3000]) ** 2, axis=0) + 1e-12)
    jump = level - uniform_filter1d(level, size=8)
    jump = unit(jump * (level > -9) * (np.abs(jump) < 1.2) * (t > .7))
    luck = unit(uniform_filter1d(rng.standard_normal((band[-1] + 1, len(t))), size=2, axis=1))
    chance = 1 / (1 + np.exp(-1.7 * unit(luck - .9 * jump)))
    stays = chance <= along(kept, hz[::16] + 8 * hz[1])[:, None]
    return signal.istft(z * stays[band], SR, nperseg=2048)[1][:N]


def low_pass(x):
    return signal.sosfilt(signal.butter(12, 14970, fs=SR, output="sos"), x)


# frequency in Hz, left minus right in dB.
BALANCE_DB = [(80, -2.3), (160, -1.7), (300, 0), (600, -2), (1200, -1.1), (2500, .8), (5000, 1.9),
              (9000, 0)]
# frequency in Hz, left lead in radians.
LEAD = [(600, 0), (2500, 1.4), (4500, 1.2), (8100, -np.pi), (9500, -4), (10400, -2 * np.pi),
        (13200, -2 * np.pi), (14000, -9)]
# frequency in Hz, share of the time kept.
KEPT_MID = [(7500, 1), (7700, .02), (8700, .04), (9100, .88), (10200, .62), (10800, .22), (11200, 1),
            (12900, .97), (13500, .4), (13900, .04), (14900, 0)]
# frequency in Hz, share of the time kept.
KEPT_SIDE = [(10100, 1), (10500, 0), (12700, 0), (13600, .14), (14800, .16), (15300, 0)]


def record(dry):
    half = np.array([[.5], [-.5]])
    ports = filtered(dry, lambda hz: invert_db(half * along(BALANCE_DB, hz)) * np.exp(1j * half * along(LEAD, hz)))
    left, right = ports / (1 + np.abs(ports / .97) ** 6) ** (1 / 6)
    mid = dropped((left + right) / 2, KEPT_MID)
    side = dropped((left - right) / 2, KEPT_SIDE)
    return low_pass(np.array([mid + side, mid - side]))


dry = scene()
out = record(dry)
int16_out(out)
```